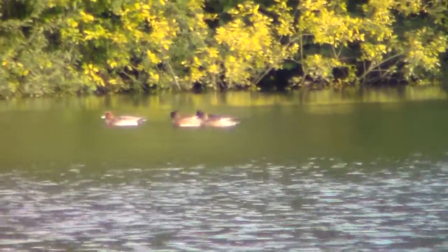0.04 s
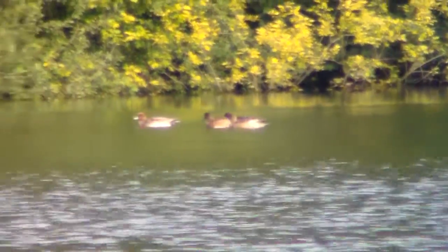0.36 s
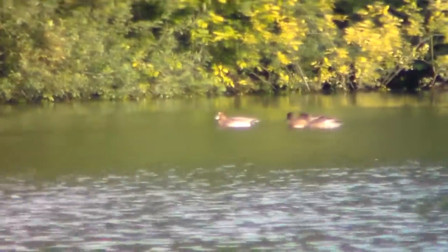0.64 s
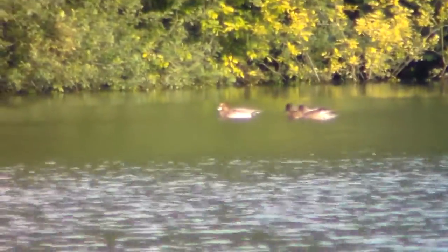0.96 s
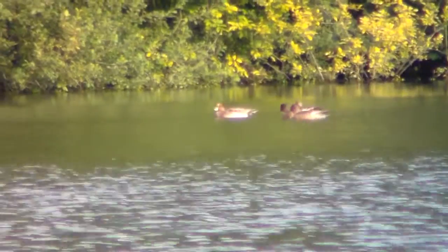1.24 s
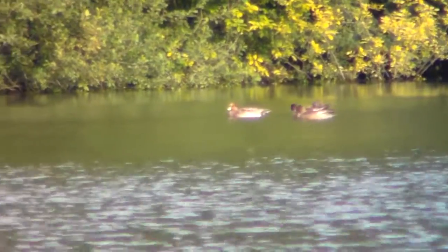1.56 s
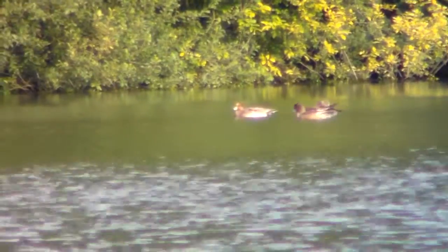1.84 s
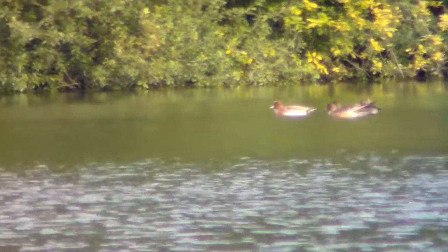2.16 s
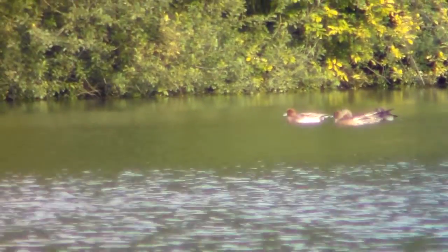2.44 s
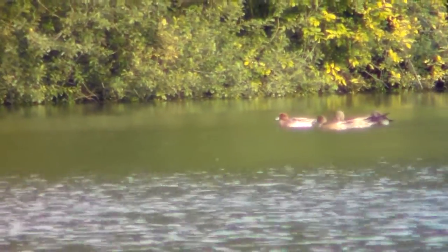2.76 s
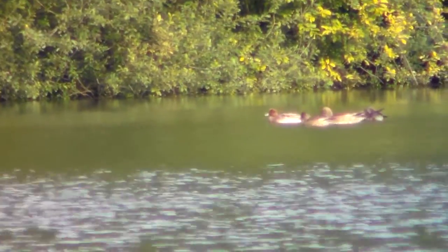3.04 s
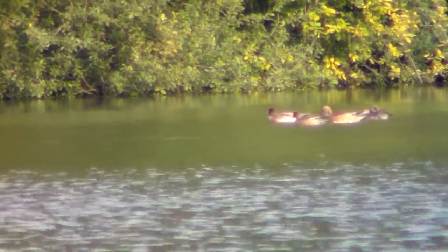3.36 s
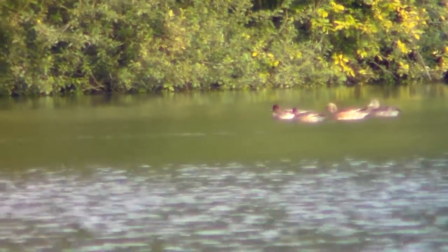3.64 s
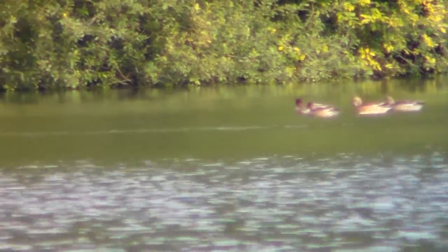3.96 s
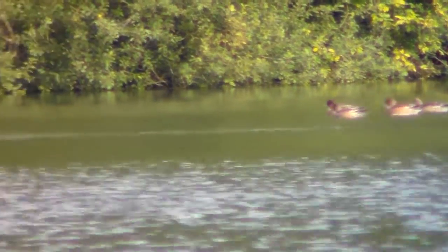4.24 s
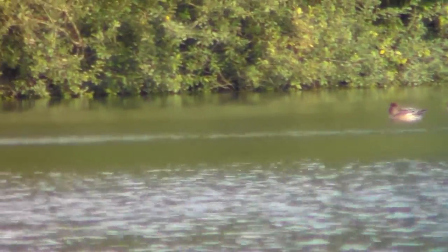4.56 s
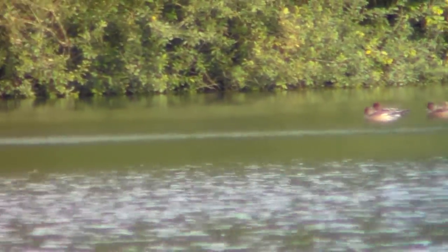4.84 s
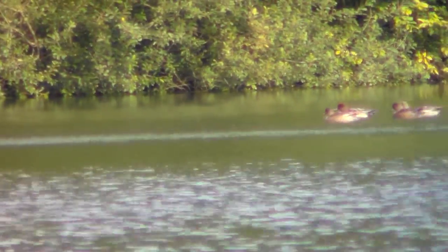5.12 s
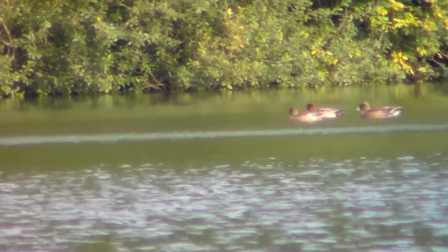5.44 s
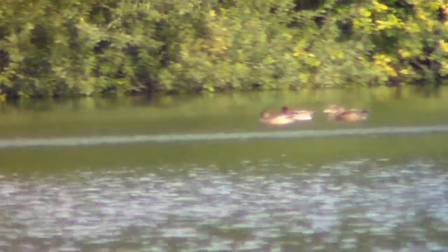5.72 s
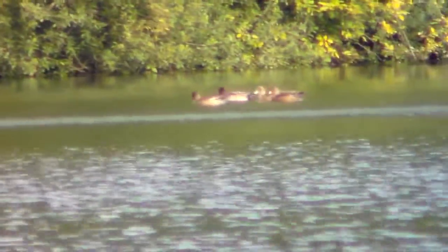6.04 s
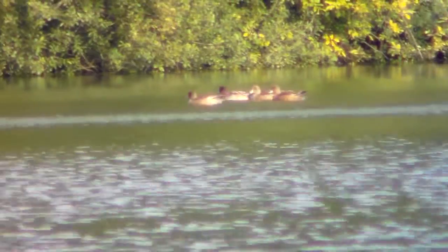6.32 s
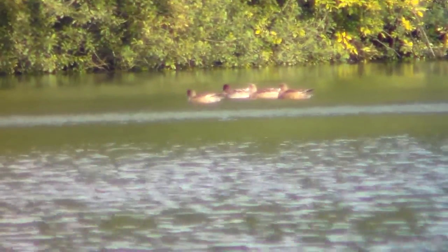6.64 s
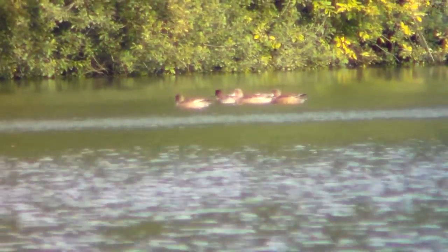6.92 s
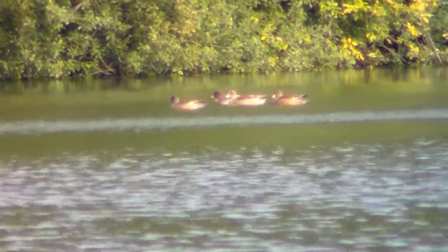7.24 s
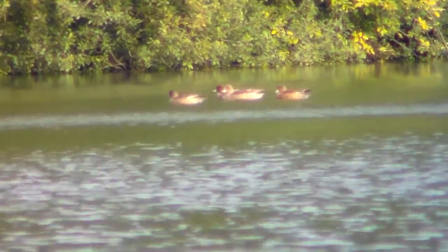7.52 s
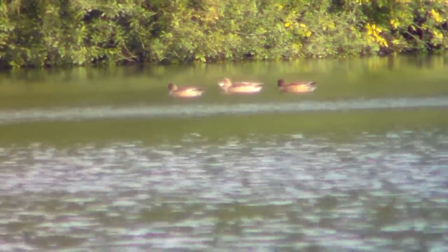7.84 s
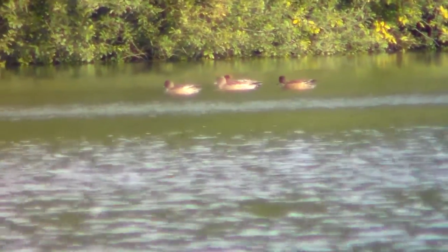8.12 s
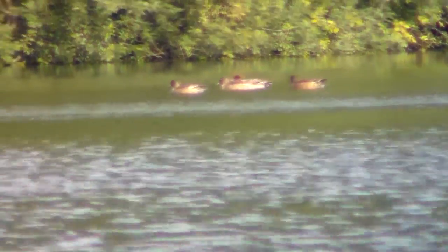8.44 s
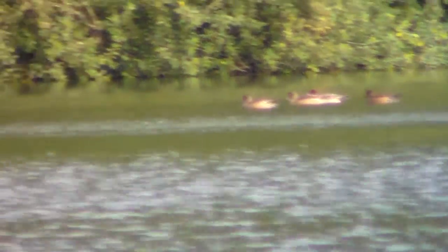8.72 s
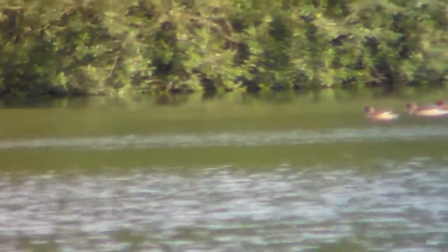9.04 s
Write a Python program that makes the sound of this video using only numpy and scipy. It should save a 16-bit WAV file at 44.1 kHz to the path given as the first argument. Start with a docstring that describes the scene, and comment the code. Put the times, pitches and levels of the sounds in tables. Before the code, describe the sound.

Two sharp plastic handling clacks, then four harsh, faraway duck quacks echoing across a lake, faint bird peeps and constant hiss.

```python
"""Two sharp clacks of a hand-held camera come first, each pulling its gain control down; faint ticks follow.
Then a duck far out on a lake quacks four times, each call shorter, lower and with the bill less open:
pulses from its syrinx excite the resonances of throat and bill, and the wooded shore reflects the calls.
Small birds peep over a steady hiss, a distant drone, a thin camera whine and a light breeze
that now and then buffets the microphone."""
import sys
import numpy as np
from scipy import signal
from scipy.fft import rfft, irfft
from scipy.io import wavfile
from scipy.ndimage import uniform_filter1d, minimum_filter1d

SR = 44100
rng = np.random.default_rng(int(sys.argv[2]) if len(sys.argv) > 2 else 0)


def transcribe(signal):
    """Save signal, clipped to [-1, 1], as a 16-bit WAV file at the path in sys.argv[1]."""
    frames = np.atleast_2d(signal).T
    limited = np.clip(frames, -1, 1)
    pcm = np.round(limited * 32767).astype(np.int16)
    wavfile.write(sys.argv[1], SR, pcm)


N = 409248
TIME = np.arange(N) / SR
# spectrum of plastic sliding and snapping: f/Hz, relative density/dB
PLASTIC_SPECTRUM = [(120, -30.5), (300, -9), (550, -1), (1900, 1), (4600, -0.5), (7400, -6), (11000, -14),
                    (14000, -24)]


def quack(length, *manner, shut_drop=.13, jitter=.012, shimmer=.25):
    """Source and filter: the syrinx gives a pulse and a puff each cycle; throat and bill add formants."""
    # formants: f/Hz with the bill open, width/Hz, gain/dB, gain added with the bill shut/dB
    formants = [(465, 120, -11, 10), (990, 370, -15, 4), (1750, 450, -10, 14.5), (2370, 280, 1, -2),
                (2810, 590, -11, 1.5), (4700, 1500, -28, -10), (6200, 1500, -23, -1), (7900, 1500, -34, -2)]
    t = np.arange(0, length, 1 / SR)
    hz, effort_db, opening = gesture(t, length, *manner)
    turns = np.cumsum(hz * (1 + jitter * wander(len(t), 110))) / SR
    pulses = evened(sum(np.cos(2 * np.pi * k * turns) for k in range(2, 40)))
    breath = np.gradient(rng.standard_normal(len(t)))  # weak in the bass, so only the treble rasps
    puffs = evened((.3 + np.exp(-(turns % 1) / .3)) * breath)
    drive = (pulses + 1.4 * puffs) * (1 + shimmer * wander(len(t), 130))
    shut, voice = 1 - opening, 0
    for k, (open_hz, width, db, shut_db) in enumerate(formants):
        centre = open_hz * (1 - shut_drop * shut)
        formant = resonate(resonate(drive, centre, width), centre, width)  # twice for steep flanks
        voice += (-1) ** k * gain_of(db + shut_db * shut) * formant  # alternate signs fill the valleys
    return gain_of(effort_db) * evened(voice) * signal.windows.tukey(len(t), .08)


def gesture(t, length, top_hz, top_at, db, widest, push_db, pitch_arch=.15, bill_arch=.55):
    """Articulation: pitch and bill opening trace one arch; effort swells, sags and ends in a push."""
    from_top = np.interp(t / length, [0, top_at, 1], [-1, 0, 1]) ** 2
    attack, release = ramp(t, .046), ramp(length - t, .028)
    push = np.exp(-((length - .02 - t) / .012) ** 2)
    effort_db = db - 14 * attack - 14 * t - 13 * release + push_db * push
    return top_hz * (1 - pitch_arch * from_top), effort_db, widest * (1 - bill_arch * from_top)


def peep(length, first_hz, last_hz, db, fade_db, waver_hz=105):
    """Frequency modulation: a small bird's pure whistle glides and wavers as it swells and fades."""
    t = np.arange(0, length, 1 / SR)
    hz = first_hz + (last_hz - first_hz) * t / length + waver_hz * wander(len(t), 200)
    whistle = evened(np.sin(2 * np.pi * np.cumsum(hz) / SR))
    level_db = db - 16 * ramp(t, .028) - fade_db * t / length
    return gain_of(level_db) * whistle * signal.windows.tukey(len(t), .15)


def shore(x, bank_s=.097, bank_db=5, bank_spread_s=.0067, alike=.66):
    """Reverberation: trees scatter decaying echoes, with a strong cluster from the nearest bank."""
    # colour of the echoes: f/Hz, relative level/dB
    foliage = [(500, -18), (1600, -6), (2000, 3), (2350, -1.5), (2850, 7), (3700, -11.5), (4700, 4),
               (8000, -7)]
    # reverberation time: f/Hz, T60/s
    decay = [(300, 0.79), (1300, 0.82), (2200, 2.2), (3200, 1.1), (8000, 0.49)]
    taps = rng.standard_normal((2, 2 * SR)) * (rng.random((2, 2 * SR)) < 2000 / SR)  # 2000 a second
    taps[1] = alike * taps[0] + np.sqrt(1 - alike ** 2) * taps[1]
    hz, t, spectra = signal.stft(taps, SR, nperseg=256)
    db = read(foliage, hz)[:, None] - 60 * t / read(decay, hz)[:, None]
    db += bank_db * np.exp(-((t - bank_s) / bank_spread_s) ** 2)
    tail = signal.istft(spectra * gain_of(db), SR, nperseg=256)[1]
    return signal.fftconvolve(x[None], tail / np.linalg.norm(tail[0]), axes=1)[:, :N]


def clack(db, rattle_s, tilt_db, knock_db, ring_db=-6, knock_hz=560, knock_width_hz=250):
    """Impact: a plastic part snaps home with a rattling crack, and the body's damped modes ring."""
    # modes of the camera body: f/Hz, relative level/dB, T60/s
    modes = [(553, -11.5, 0.013), (764, -3, 0.03), (930, -9, 0.099), (1310, -4, 0.06), (1883, 6.5, .018),
             (2940, -5, 0.042), (3580, -20, .04), (4670, 2, .014), (7180, 5, 0.0071), (10800, -3, .007)]
    t, hz = np.arange(4096) / SR, np.fft.rfftfreq(4096, 1 / SR)
    grit = rng.standard_normal(len(t)) + 1.96 * rng.standard_normal((2, len(t)))  # common + per port
    rattle = np.exp(-t / rattle_s) + gain_of(-24) * np.exp(-t / .0085)
    crack = irfft(rfft(grit * rattle) * gain_of(read(PLASTIC_SPECTRUM, hz)))
    ring = sum((-1) ** k * gain_of(mode_db - 60 * t / t60) * np.sin(2 * np.pi * f * t)
               for k, (f, mode_db, t60) in enumerate(modes))
    hollow = np.exp(-((hz - knock_hz) / knock_width_hz) ** 2)
    colour_db = tilt_db * np.log2((hz + 300) / 3000) + knock_db * hollow
    blow = irfft(rfft(sized(crack, 0) + sized(ring, ring_db)) * gain_of(colour_db))
    fade = signal.windows.hann(8192)[4096:]
    return sized(np.roll(blow, 64, axis=1) * fade, db)  # a lead of 64 samples keeps the onset whole


def tick(db, low_hz, high_hz, high_db, decay_s=.0032, dry_db=-16):
    """Friction: a tiny dry scrape excites two damped resonances."""
    t = np.arange(2048) / SR
    scrape = rng.standard_normal(len(t)) * np.exp(-t / decay_s)
    low, high = (evened(resonate(resonate(scrape, hz, .35 * hz), hz, .8 * hz))
                 for hz in (low_hz, high_hz))
    return sized(low + gain_of(high_db) * high + gain_of(dry_db) * evened(scrape), db)


def handling():
    """Contact noise of the camera: clacks, ticks and a part that slides before it snaps home."""
    # blows on the body: t/s, level over 10 ms/dB, rattle time constant/s, tilt/(dB/octave), knock/dB
    blows = [(0.0933, -47, .003, 1.5, -4), (0.106, -55, .002, 5, 0), (0.3001, -42.5, .002, 2, -4),
             (0.3101, -25.5, 0.0016, 1.5, -8), (1.2373, -27, .002, 2.2, 8), (1.2398, -20.7, .0017, 2.3, 7)]
    # fingers on the casing: t/s, level over 10 ms/dB, lower f/Hz, upper f/Hz, upper gain/dB
    touches = [(.8092, -57.5, 2410, 4800, -5.5), (1.1294, -63, 1390, 3300, 7),
               (3.8092, -53.5, 2720, 5000, -5), (3.813, -55.5, 1190, 1290, -10),
               (5.3367, -54.5, 5070, 9500, -12), (5.3546, -58, 4960, 8400, 1),
               (5.5173, -63, 4740, 6500, -8), (5.685, -64, 4800, 5600, -3), (5.723, -61, 4900, 6500, -7),
               (5.979, -63, 4500, 5500, -3), (6.0032, -54, 5150, 11100, 1), (6.0045, -57, 1000, 1490, -3),
               (6.4893, -56.5, 1210, 2850, 0), (7.7289, -52.5, 2450, 6200, -10),
               (8.125, -56.5, 1100, 3050, 0), (8.1684, -63, 2800, 5500, -11), (8.2754, -52, 900, 3050, -4),
               (8.436, -51, 930, 2900, -9)]
    clacks, ticks = np.zeros((2, N)), np.zeros(N)
    for s, *blow in blows:
        add(clacks, s - 64 / SR, clack(*blow))
    for s, *touch in touches:
        add(ticks, s, tick(*touch))
    clacks[1] = np.roll(clacks[1], 2)  # they reach the left port first
    slide_db = np.interp(TIME, [.28, .297, .310, .313], [-65, -45, -39, -69.5], left=-200, right=-200)
    slide = stereo_noise(PLASTIC_SPECTRUM, [(2000, .54)]) * gain_of(slide_db)
    return panned(clacks + slide, 3.8) + panned(ticks, 3.3)


def rumble(breeze_db=-1, breeze_left_db=2.3):
    """Incoherent addition: wind turbulence at the microphone and one handling thump sum in power."""
    # strength of the breeze: t/s, relative level/dB
    breeze = [(0, -52), (1.55, -53), (1.85, -48.5), (2.4, -50.5), (2.96, -50), (3.32, -44.5), (3.9, -49),
              (4.4, -44.5), (4.62, -50.6), (9.26, -53)]
    # low bumps at the microphone: buffets of air, and one handling thump just before the second clack:
    # peak t/s, half width/s, level/dB, left over right/dB
    bumps = [(.82, .06, -53, 10), (1.21, .04, -46, -3), (2.86, .09, -51, 10), (3.52, .14, -45, 16),
             (4.0, .14, -52, 12), (4.89, .06, -46.3, 22), (5.24, .07, -50, 13), (5.44, .05, -50, 14),
             (6.02, .06, -52, 9)]
    # rumble: f/Hz, relative density/dB
    spectrum = [(10, -12.5), (27, 0.5), (55, -2), (100, -7), (160, -15), (300, -28), (900, -65)]
    power = panned(gain_of(curve(breeze) + breeze_db), breeze_left_db) ** 2
    for s, width_s, db, left_db in bumps:
        power += panned(gain_of(db), left_db) ** 2 * np.exp(-((TIME - s) / width_s) ** 2)
    return stereo_noise(spectrum, [(40, .51), (150, .76)]) * np.sqrt(power)


def drone(trim_db=1.3):
    """Amplitude modulation: a distant band of low noise swells and sinks."""
    # swells: t/s, relative level/dB
    swells = [(0, -57.5), (1.15, -59), (1.6, -64.5), (2.0, -55), (2.32, -55), (2.66, -49.5), (2.92, -55.5),
              (3.32, -51), (3.42, -57.5), (4.2, -54.5), (4.52, -60), (4.96, -52.2), (5.4, -58.5),
              (5.92, -51.2), (6.16, -57), (6.38, -52.5), (6.66, -60.5), (7.22, -59), (7.38, -49.5),
              (8.02, -52), (8.2, -56), (8.65, -57.5), (8.9, -51), (9.26, -56)]
    # drone: f/Hz, relative density/dB
    spectrum = [(50, -16.5), (110, -6), (170, -6), (230, 1.5), (280, -1.5), (325, -6), (380, -18.5),
                (500, -16.5), (900, -56)]
    return panned(stereo_noise(spectrum, [(200, .97)]) * gain_of(curve(swells) + trim_db), .6)


def hiss(db=-58.5, waver_db=.95):
    """Broadband noise of the open air, less coherent between the channels in the treble."""
    # hiss: f/Hz, relative density/dB
    spectrum = [(250, -12), (430, -5.5), (620, -7), (1020, -6.5), (1400, -9.5), (2300, -11.5), (3500, -14),
                (4300, -16.5), (7000, -18), (10000, -20), (14000, -20.5)]
    # likeness of left and right: f/Hz, correlation
    coherence = [(400, 0.6), (1500, 0.68), (3500, 0.26), (7000, 0.15), (14000, .3)]
    return stereo_noise(spectrum, coherence) * gain_of(db + waver_db * wander(N, 2))


def whine():
    """Narrow-band noise: a thin, fuzzy tone from inside the camera."""
    return gain_of(-78.5) * evened(resonate(rng.standard_normal(N), hz=3590, width=90))


def gain_of(db):
    """Amplitude ratio of a level in decibels."""
    return 10 ** (np.asarray(db) / 20)


def evened(x):
    """Normalises to rms 1."""
    return x / np.sqrt(np.mean(x ** 2) + 1e-20)


def sized(blow, db):
    """Gives a transient the energy of 10 ms at level db."""
    return gain_of(db) * blow * np.sqrt(SR / 100 / np.sum(blow ** 2, axis=-1, keepdims=True))


def read(points, hz):
    """Interpolates (f/Hz, value) points on a log-frequency axis."""
    f, value = np.transpose(points)
    return np.interp(np.log(hz + 1), np.log(f + 1), value)


def curve(points):
    """Interpolates (t/s, value) points at every sample."""
    return np.interp(TIME, *np.transpose(points))


def ramp(t, length_s):
    """Falls linearly from 1 at t = 0 to 0 at length_s and stays there."""
    return np.clip(1 - t / length_s, 0, 1)


def add(mix, s, sound):
    """Superposes a sound on the mix at time s."""
    part = mix[..., round(s * SR):][..., :sound.shape[-1]]
    part += sound[..., :part.shape[-1]]


def panned(x, left_db):
    """Level difference: the left channel exceeds the right by left_db."""
    return x * gain_of([[left_db / 2], [-left_db / 2]])


def wander(size, hz):
    """Low-pass noise of rms 1, up to about hz."""
    f = np.fft.rfftfreq(size, 1 / SR)
    return evened(irfft(rfft(rng.standard_normal(size)) * np.exp(-(f / hz) ** 2), size))


def resonate(x, hz, width):
    """A damped resonance of gain 1 whose centre follows hz."""
    phasor = np.exp(2j * np.pi * np.cumsum(hz * np.ones(len(x))) / SR)
    pole = np.exp(-np.pi * width / SR)
    return 2 * (phasor * signal.lfilter([1 - pole], [1, -pole], x / phasor + 1e-18)).real


def stereo_noise(spectrum, coherence):
    """Two partly coherent channels of noise with the given spectrum."""
    hz = np.fft.rfftfreq(N, 1 / SR)
    left, other = rfft(rng.standard_normal((2, N)))
    alike = read(coherence, hz)
    right = alike * left + np.sqrt(1 - alike ** 2) * other
    return evened(irfft(np.array([left, right]) * gain_of(read(spectrum, hz)), N))


def scene(duck_db=-4, duck_echo_db=-9, bird_echo_db=-5):
    """Superposition: direct and reflected calls, the open air and the camera."""
    # quacks: t/s, length/s, top f/Hz, place of the top (0-1), effort/dB, bill opening (0-1), push/dB
    quacks = [(3.476, .232, 247, .55, -47.8, .97, 4.5), (3.838, .214, 243, .45, -47, .8, -2),
              (4.195, .142, 228, .48, -47, .42, 0), (4.46, .122, 202, .65, -53.5, .2, 7.5)]
    # bird notes: t/s, length/s, first f/Hz, last f/Hz, level/dB, fade over the note/dB
    peeps = [(2.25, .08, 7800, 7000, -73, 4), (5.615, .27, 8300, 7950, -74, 4),
             (5.88, .09, 7850, 7460, -70, 8), (6.07, .095, 8080, 8020, -62, 10),
             (6.535, .095, 3300, 4650, -50, 14), (6.612, .032, 4900, 5080, -59, 2),
             (7.12, .09, 8020, 7930, -63.5, 7)]
    duck, birds = np.zeros(N), np.zeros(N)
    for s, *call in quacks:
        add(duck, s, quack(*call))
    for s, *note in peeps:
        add(birds, s, peep(*note))
    echoes = shore(gain_of(duck_echo_db) * duck + gain_of(bird_echo_db) * birds)
    direct = gain_of(duck_db) * np.array([np.roll(duck, 1), duck])  # the duck is a little to the right
    return panned(direct + echoes, -1.7) + birds + hiss() + drone() + rumble() + whine() + handling()


def record(dry, limit_db=-31, hold_s=.39, recover_db_per_s=48, attack_s=.012, edge_hz=14350):
    """Automatic gain control drops at loud clacks, holds and recovers; saturation and low-pass follow."""
    power = uniform_filter1d((dry ** 2).mean(0), size=441)
    over_db = np.maximum(10 * np.log10(abs(power) + 1e-12) - limit_db, 0)
    half_hold = int(hold_s * SR / 2)
    held_db = -minimum_filter1d(-over_db, size=2 * half_hold + 1, origin=half_hold, mode="constant")
    recovery_db = TIME * recover_db_per_s
    cut_db = np.maximum.accumulate(held_db + recovery_db) - recovery_db
    pole = np.exp(-1 / (attack_s * SR))
    cut_db = np.roll(signal.lfilter([1 - pole], [1, -pole], cut_db), 260)  # late, so the onset passes
    limited = .45 * np.tanh(dry / gain_of(cut_db) / .45)
    circuit_hiss = gain_of(-74) * rng.standard_normal((2, N))
    low_pass = signal.firwin(511, edge_hz, window=("kaiser", 9), fs=SR)
    return signal.oaconvolve(limited + circuit_hiss, low_pass[None], "same")


dry = scene()
out = record(dry)
transcribe(out)
```